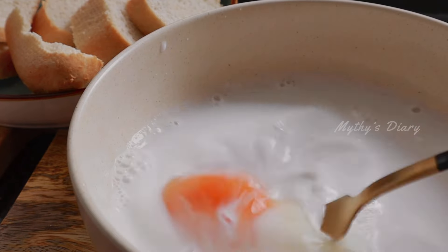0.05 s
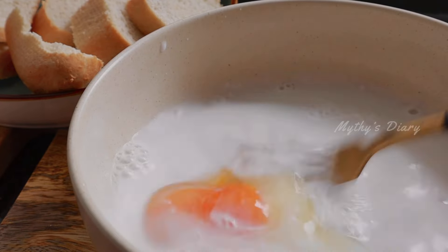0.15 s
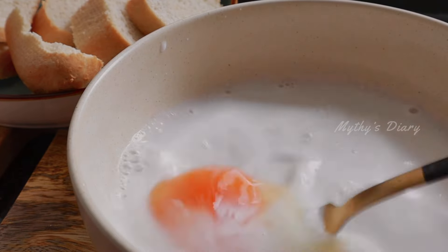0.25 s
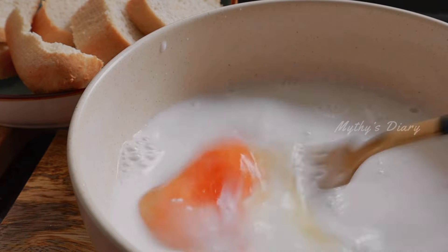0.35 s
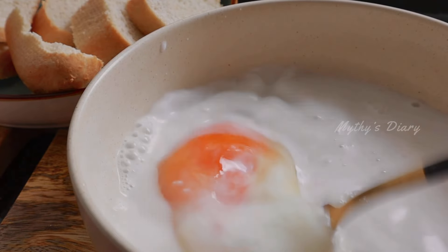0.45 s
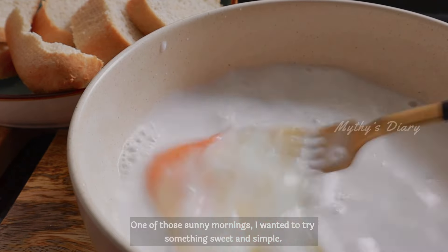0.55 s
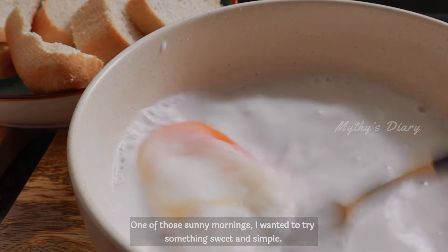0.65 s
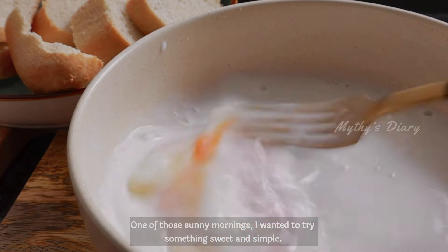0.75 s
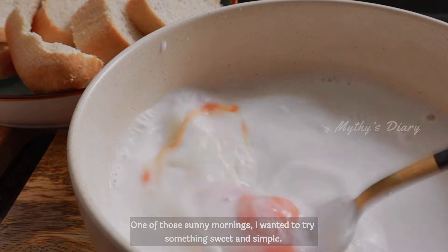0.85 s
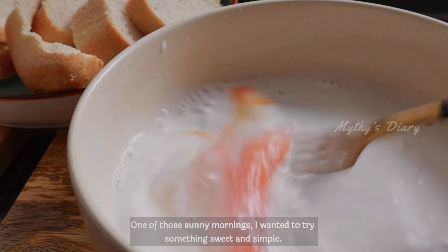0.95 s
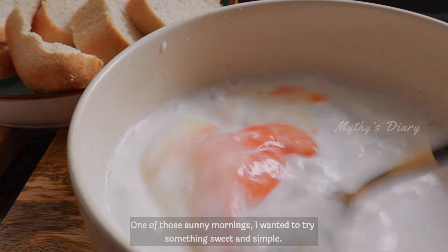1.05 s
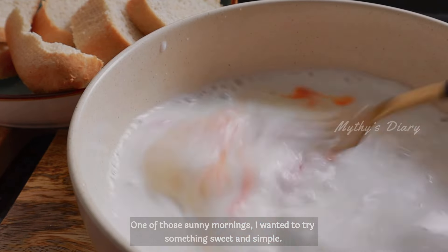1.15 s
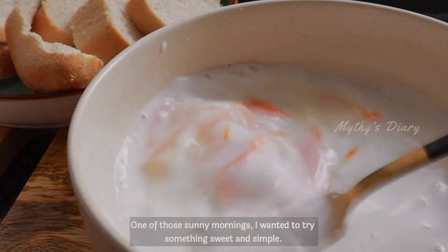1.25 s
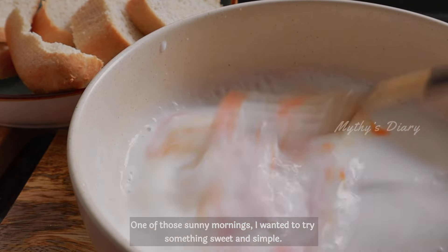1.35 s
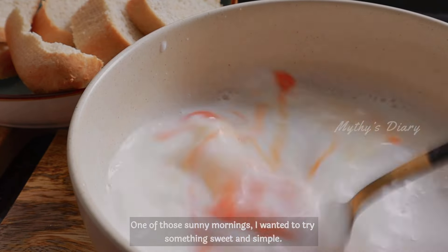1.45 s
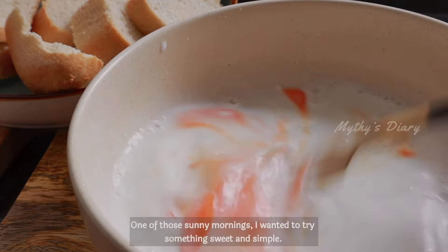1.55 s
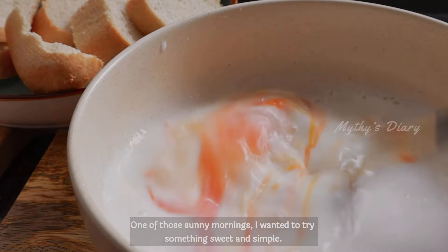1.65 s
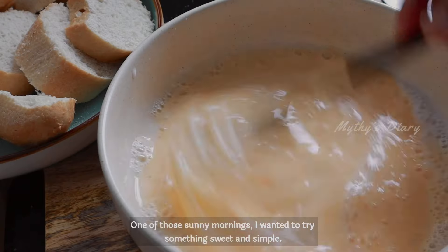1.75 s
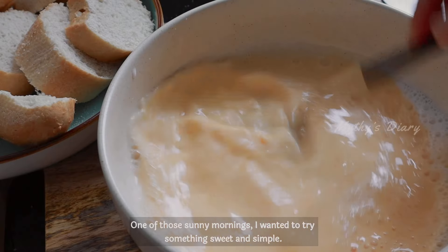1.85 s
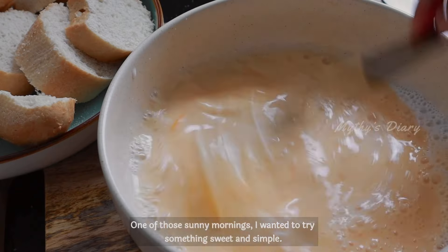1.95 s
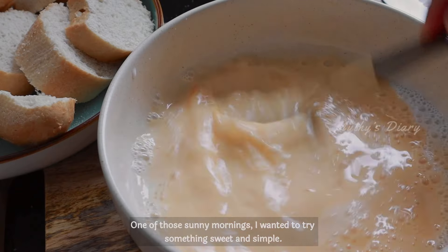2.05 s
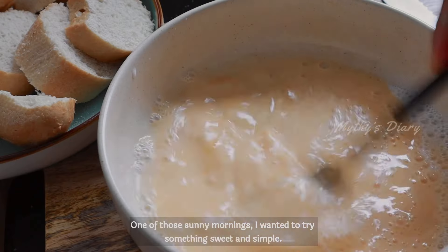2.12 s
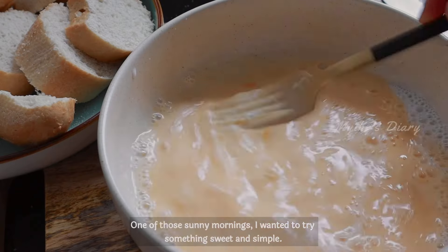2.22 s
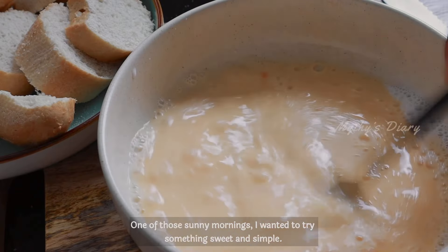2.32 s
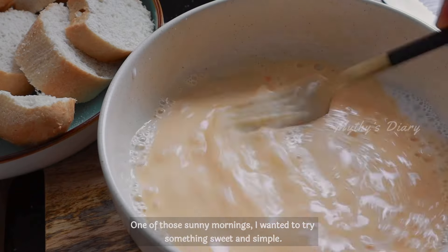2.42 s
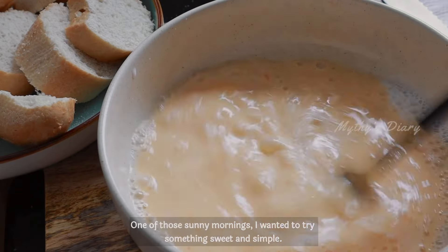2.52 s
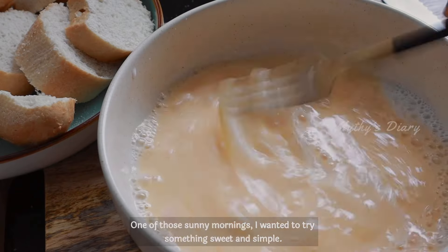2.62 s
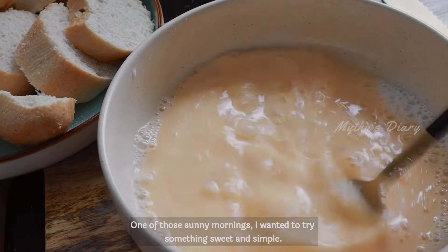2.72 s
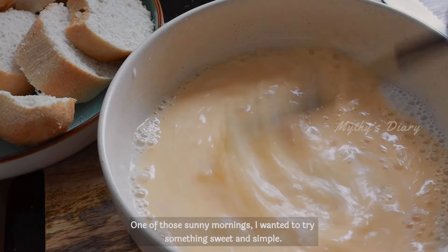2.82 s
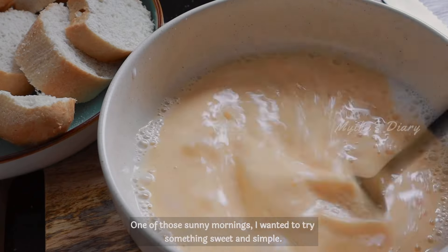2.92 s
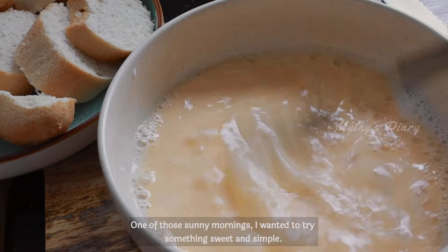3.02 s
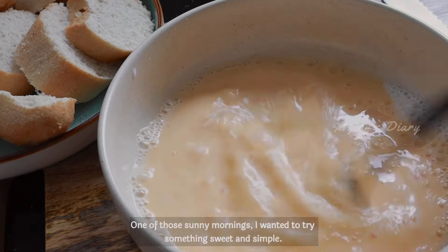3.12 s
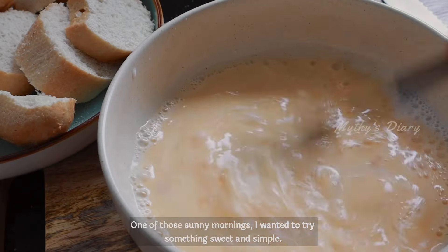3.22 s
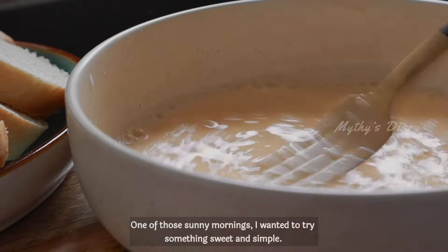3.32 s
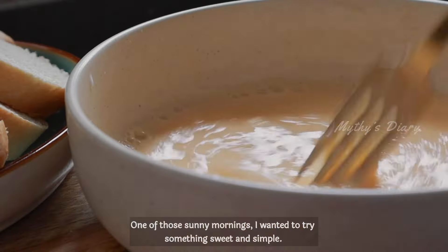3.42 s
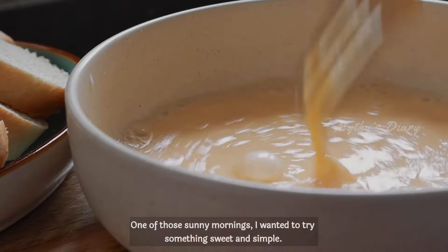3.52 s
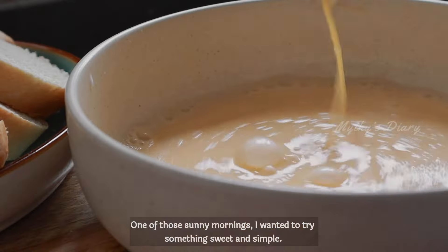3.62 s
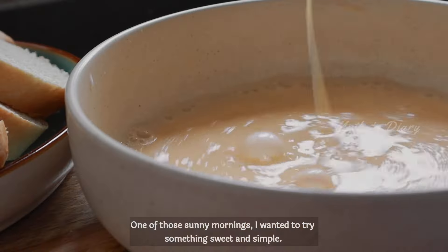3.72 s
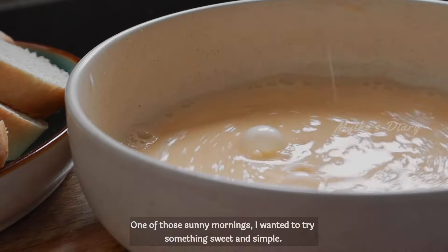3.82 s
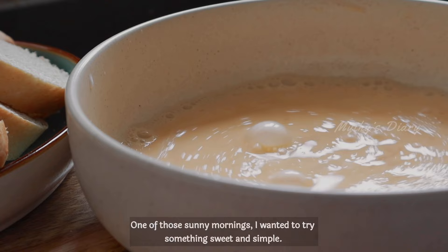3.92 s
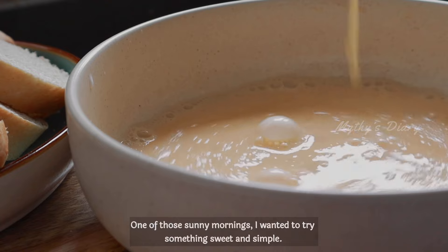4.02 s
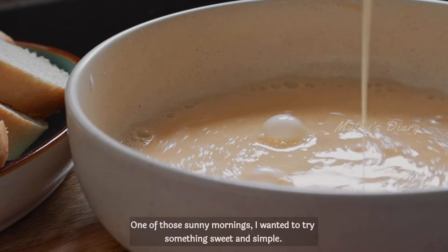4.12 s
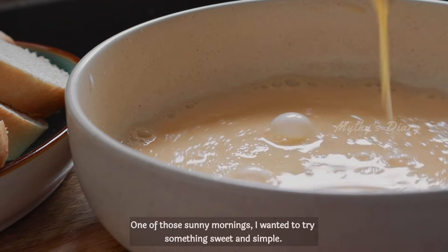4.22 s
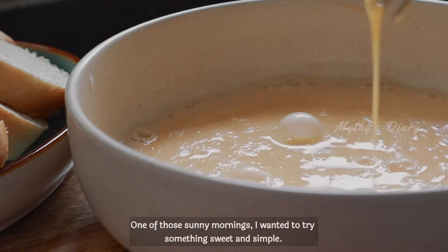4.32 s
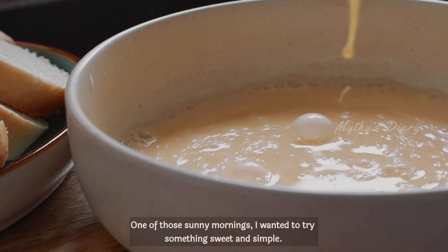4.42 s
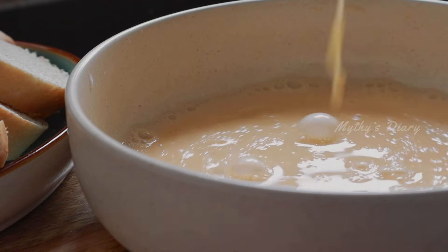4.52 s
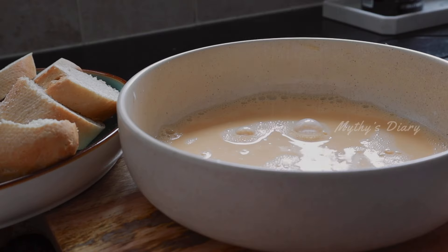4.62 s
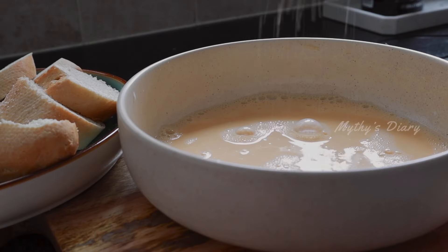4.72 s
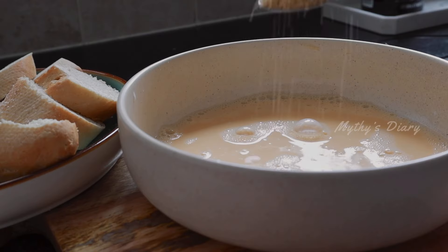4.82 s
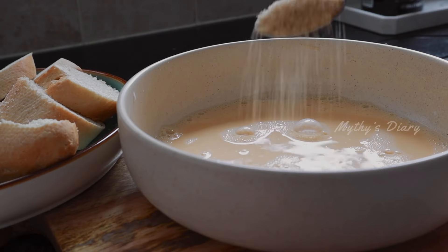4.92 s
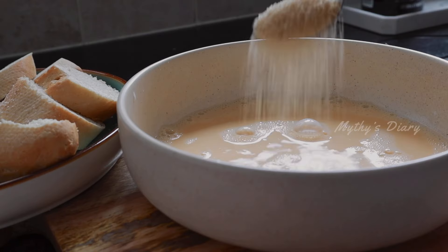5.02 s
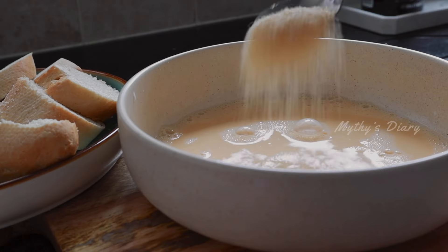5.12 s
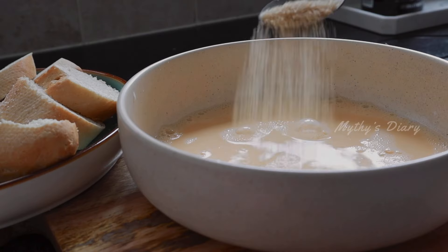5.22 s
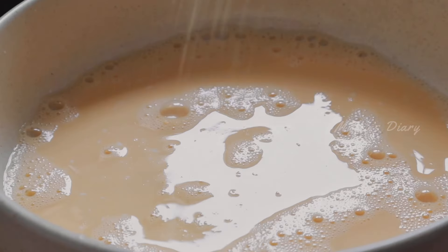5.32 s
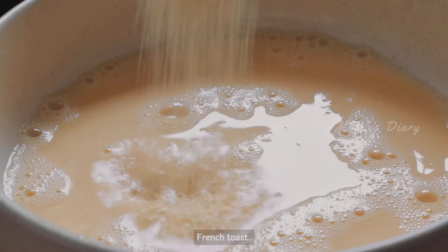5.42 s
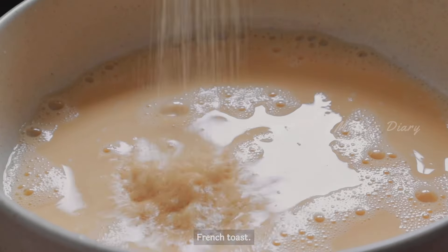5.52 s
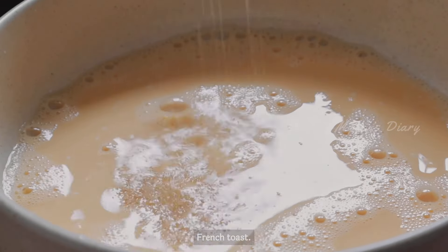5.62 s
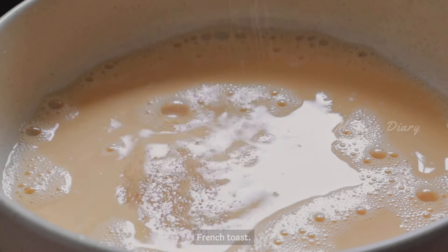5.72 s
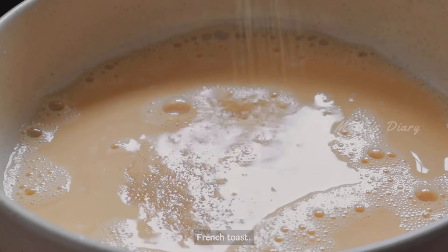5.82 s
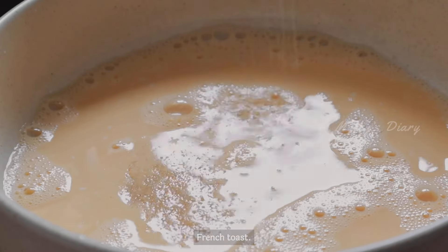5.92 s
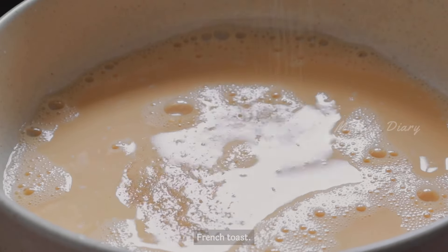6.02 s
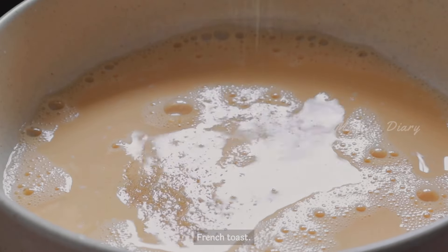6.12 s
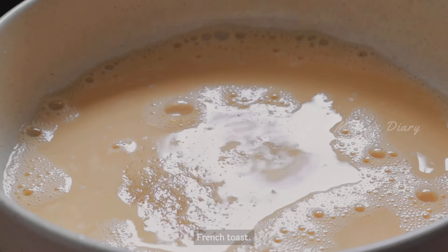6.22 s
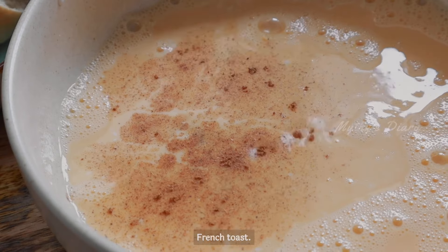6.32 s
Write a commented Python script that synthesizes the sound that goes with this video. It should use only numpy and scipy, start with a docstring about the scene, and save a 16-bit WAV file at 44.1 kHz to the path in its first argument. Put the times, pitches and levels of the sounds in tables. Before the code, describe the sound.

A metal fork briskly beats egg and milk in a ceramic bowl with bright clinks and wet plops, then sugar sprinkles off a spoon.

```python
"""A steel fork beats egg and milk in a ceramic bowl, over hum, hiss and low rumble in a quiet kitchen.
From the start each stroke knocks noise bursts into the bowl's rings and drags gritty tines along the glaze;
trapped air plops out as rising sines, and the bowl bumps the table. After 3.5 s the beating has stopped and
noise bursts knock across the kitchen. From 4.7 s a spoon sprinkles sugar: sparse clicks and ringing ticks.
Close sound with a short room echo, in five short passages faded in and out."""
import sys
import numpy as np
from scipy import signal
from scipy.fft import rfft, irfft, next_fast_len
from scipy.io import wavfile
from scipy.ndimage import uniform_filter1d, map_coordinates

SR = 44100
rng = np.random.default_rng(int(sys.argv[2]) if len(sys.argv) > 2 else 0)


def undo_db(level):
    """Turn decibels back into plain size, where 20 dB means ten times bigger."""
    steps = np.asarray(level, float) / 20
    return 10 ** steps


def dump(signal):
    """Clip the signal to [-1, 1] and save it as 16-bit WAV at the path in sys.argv[1]."""
    limited = np.clip(np.atleast_2d(signal).T, -1, 1)
    pcm = np.round(limited * 32767).astype(np.int16)
    wavfile.write(sys.argv[1], SR, pcm)


N = 280476
TIME = np.arange(N) / SR


def unit(x):
    """Scale to rms 1."""
    return x / np.sqrt(np.mean(np.abs(x) ** 2) + 1e-20)


def along(points, hz):
    """Read a curve of (frequency [Hz], value) points on a log frequency axis."""
    f, value = np.transpose(points)
    return np.interp(np.log(hz + 1), np.log(f + 1), value)


def level(rows):
    """Gain per sample from (time [s], level [dB]) rows, practically silent outside them."""
    return undo_db(np.interp(TIME, *np.transpose(rows), -150, -150))


def swell(peak, db, up_db_per_s, down_db_per_s):
    """Gain that climbs to a peak and falls away, straight in dB."""
    return undo_db(db - np.maximum(up_db_per_s * (peak - TIME), down_db_per_s * (TIME - peak)))


def wobble(rate):
    """A smooth random curve, rate knots a second."""
    knots = rng.standard_normal(int(N * rate / SR) + 4)
    return map_coordinates(knots, [TIME * rate])


def filtered(x, response, size):
    """x through a complex response of frequency, size samples long."""
    m = next_fast_len(size + 8192)
    return irfft(rfft(x, m) * response(np.fft.rfftfreq(m, 1 / SR)), m)[:size]


def causal(gain):
    """Minimum-phase response with this gain: the energy comes as early as it can."""
    cepstrum = irfft(np.log(gain + 1e-6))
    half = len(cepstrum) // 2
    cepstrum[1:half] *= 2
    cepstrum[half + 1:] = 0
    return np.exp(rfft(cepstrum))


def modes(table, f, spread_db, damping=1):
    """Sum of resonances of alternating sign, each at a new random strength; damping widens them."""
    draw = rng.normal(0, spread_db, len(table))
    total = 0
    for k, (centre, width, db) in enumerate(table):
        loss = 1j * f * width * damping
        total = total + (-1) ** k * undo_db(db + draw[k]) * loss / (centre * centre - f * f + loss)
    return total


def grit(size, density, spread_db):
    """Sparse contacts of uneven size, density a second on average, rms 1."""
    hit = rng.random(size) < density / SR
    return unit(hit * rng.standard_normal(size) * undo_db(spread_db * rng.exponential(1, size)))


def patchy(x, depth_db):
    """Random gain in patches of some hundred Hz by some ms: the contact spot keeps changing."""
    z = signal.stft(x, nperseg=256)[2]
    field = uniform_filter1d(rng.standard_normal(z.shape), size=3, axis=0)
    field = uniform_filter1d(field, size=4, axis=1)
    return unit(signal.istft(z * undo_db(depth_db * unit(field)), nperseg=256)[1][:len(x)])


def add(track, s, x):
    """Mix x in at time s."""
    part = track[round(s * SR):][:len(x)]
    part += x[:len(part)]


# spectrum of the room tone: (frequency [Hz], density [dB per Hz])
ROOM_SPECTRUM = [(24, -45.5), (40, -15.5), (70, -6.5), (168, -7.5), (222, -2.5), (308, -10), (358, -14),
                 (406, -13), (593, -19.5), (725, -18.5), (1940, -25), (2760, -26.5), (3730, -28),
                 (14500, -32), (15900, -34), (16500, -46.5)]


def room_tone():
    """Wavering hum and steady hiss of the kitchen: noise split near 420 Hz, each part rms 1."""
    noise = rng.standard_normal((2, N))

    def bass(f):
        return 1 / (1 + (f / 420) ** 4)

    hum = filtered(noise[0] * undo_db(2.0 * wobble(30)), lambda f: undo_db(along(ROOM_SPECTRUM, f)) * bass(f), size=N)
    hiss = filtered(noise[1], lambda f: undo_db(along(ROOM_SPECTRUM, f)) * (1 - bass(f)), size=N)
    return unit(hum), unit(hiss)


# swells of the rumble: (peak time [s], level before trim [dB])
RUMBLE_SWELLS = [(.1, -57), (.5, -61.5), (.95, -67), (1.171, -50), (1.6, -51), (1.95, -54.5), (2.3, -56),
                 (2.699, -62.5), (4.25, -73), (5, -76), (5.55, -65), (6.1, -61)]


def rumble():
    """Noise through a resonance at 53 Hz, in swells that climb fast and fade slowly."""
    noise = filtered(rng.standard_normal(N), lambda f: modes([(53.3, 30, 0)], f, spread_db=0) ** 2, size=N)
    gain = sum(swell(s, db, up_db_per_s=90, down_db_per_s=35.5) for s, db in RUMBLE_SWELLS)
    return unit(noise) * gain * undo_db(-6.5)


# decay of the room: (frequency [Hz], time to fall 60 dB [s])
ROOM_DECAY = [(300, 1), (2000, 0.69), (6000, 0.54), (14000, 0.45)]


def kitchen(x):
    """The room answers each tenth of a second with a fresh noise tail; near surfaces answer first and stronger."""
    out, step = np.zeros(N), SR // 10
    for start in range(0, N, step):
        piece = x[start:start + step]
        if np.any(piece):
            hz, t, z = signal.stft(rng.standard_normal(SR // 2), SR, nperseg=256)
            decay = undo_db(-60 * t / along(ROOM_DECAY, hz)[:, None])
            early = 1 + 1.3 * undo_db(-60 * t / 0.1)
            tail = signal.istft(z * decay * early, SR, nperseg=256)[1]
            add(out, start / SR + .006, signal.fftconvolve(piece, tail / np.linalg.norm(tail)))
    return out


# knocks across the kitchen: (time [s], level [dB], time to fall 60 dB [s])
FAR_KNOCKS = [(3.701, -45.5, 0.44), (3.892, -45, .03)]
# their spectrum: (frequency [Hz], density [dB per Hz])
FAR_SPECTRUM = [(350, -46), (600, -12), (1450, -3.5), (4050, -11), (4780, -11), (8990, -18), (16000, -36.5)]


def far_knocks():
    """Knocks from across the kitchen arrive mostly as echo: a burst of noise that dies away."""
    out, t = np.zeros(N), np.arange(SR // 3) / SR
    for s, db, t60 in FAR_KNOCKS:
        burst = filtered(rng.standard_normal(len(t)), lambda f: undo_db(along(FAR_SPECTRUM, f)), size=len(t))
        add(out, s, undo_db(db - 60 * t / t60) * unit(burst))
    return out


# ticks at the spoon: (time [s], level [dB], pitch [Hz])
SPOON_TICKS = [(4.7101, -20.5, 3220), (4.7148, -24.5, 2990), (4.9283, -37, 2930), (4.9456, -40, 8300),
               (4.9736, -44, 4690), (5.0861, -42, 8480), (5.1163, -38, 4640), (5.195, -41, 7900),
               (5.2268, -36, 4650), (5.247, -36, 4680), (5.3125, -26, 7500), (5.5086, -32.5, 8800),
               (5.53, -31.5, 8240), (5.572, -38, 6500), (5.6144, -45, 8610), (5.7258, -41.5, 7800),
               (5.766, -45.5, 8360), (5.8292, -46.5, 8640), (5.9394, -28, 7500), (5.9703, -45, 8060),
               (6.0129, -37, 8040), (6.0197, -32, 8500), (6.113, -42.5, 7520), (6.1252, -46, 7480)]


def spoon_ticks():
    """Lone crystals tick the spoon: a short sine with a crack of noise, thinned below 1.3 kHz."""
    ticks, t = np.zeros(N), np.arange(600) / SR
    for s, db, hz in SPOON_TICKS:
        crack = rng.standard_normal(len(t)) * undo_db(-60 * t / 0.0046)
        add(ticks, s, undo_db(db - 60 * t / 0.008) * (np.sin(2 * np.pi * hz * t) + 0.54 * crack))
    # a crystal is too small for bass
    return filtered(ticks, lambda f: (1j * f / (1300 + 1j * f)) ** 3, size=N)


# shakes of the spoon: (peak time [s], level before trim [dB], time of the last 23 dB of rise [s],
# fall [dB per s], level of the part under 5.5 kHz against the part above [dB])
SUGAR_SHAKES = [(4.714, -41.5, 0.0032, 136, 1), (4.926, -53, .004, 126, -4), (5.09, -50.5, .02, 170, -7),
                (5.195, -52.5, 0.014, 103, -5.5), (5.231, -46.5, 0.059, 111, 1),
                (5.506, -47, 0.014, 75, -5.5), (5.636, -42, .07, 222, -4.5), (5.938, -45.5, .016, 400, -15),
                (6.018, -46, .026, 390, -23), (6.112, -56, .008, 202, -3)]
# spectrum of the crystals: (frequency [Hz], density [dB per Hz])
GRAIN_SPECTRUM = [(1060, -73), (1800, -13.5), (3740, -16), (4380, -11), (6060, -7.5), (8310, -4),
                  (10400, -10), (14900, -8), (16000, -11), (16500, -37.5)]
# rings of the spoon: (frequency [Hz], width [Hz], level [dB])
SPOON_MODES = [(3380, 220, -0.5), (4650, 120, -3), (7545, 530, -2.5), (8540, 420, 1)]


def sugar():
    """Crystals slide off the ringing spoon and patter on the mix in clumps: sparse grit, swelling with each shake."""
    fall = grit(N, density=10000, spread_db=2.5) * undo_db(2.2 * wobble(70))
    fall = patchy(fall, depth_db=3)

    def lower(f):
        return 1 / (1 + (f / 5500) ** 6)

    def colour(f):
        ring = 2.5 + 1.1 * np.abs(modes(SPOON_MODES, f, spread_db=2))
        return undo_db(along(GRAIN_SPECTRUM, f)) * ring / (1 + (2500 / (f + 1)) ** 6)

    low = unit(filtered(fall, lambda f: causal(colour(f) * lower(f)), size=N))
    high = unit(filtered(fall, lambda f: causal(colour(f) * (1 - lower(f))), size=N))
    patter = np.zeros(N)
    for s, db, rise, fall_db_per_s, low_db in SUGAR_SHAKES:
        patter += swell(s, db, 23 / rise, fall_db_per_s) * (high + low * undo_db(low_db))
    return spoon_ticks() + patter * undo_db(-3.5)


# the bowl bumps the table: (time [s], level before trim [dB], level of the upper modes [dB])
TABLE_BUMPS = [(0.114, -48.5, -11), (0.308, -46, -18), (0.514, -42, -7.5), (0.919, -41.5, -8),
               (1.159, -48, -2), (1.195, -46.5, 0), (1.544, -53.5, -0.5), (1.577, -49.5, -8),
               (1.952, -36.5, 0.5), (2.145, -36, 3.5), (2.35, -38.5, 2), (2.551, -41.5, 1.5),
               (2.773, -37, 3.5), (2.983, -39, 2), (3.191, -42, 2.5), (3.456, -39.5, -2)]
# modes of bowl on table: (frequency [Hz], width [Hz], level [dB])
TABLE_MODES = [(160, 15, 3.5), (242.3, 15, -2), (337, 35, -0.5)]


def bumps():
    """Hard strokes rock the bowl on the table: a soft, uneven push of some milliseconds."""
    out = np.zeros(N)
    for s, db, upper_db in TABLE_BUMPS:
        push = np.convolve(np.hanning(60), rng.standard_normal(700) * np.hanning(1400)[700:])

        def body(f):
            lowest = modes(TABLE_MODES[:1], f, spread_db=0.5)
            return lowest - undo_db(upper_db) * modes(TABLE_MODES[1:], f, spread_db=0.0)

        thud = filtered(push, body, size=12000)
        add(out, s, undo_db(db + 1.0) * thud / np.abs(thud).max())
    return out


def bubble(hz, t60, rise, t):
    """Trapped air rings unsteadily at a pitch that rises as the pocket nears the surface."""
    pitch = hz * 2 ** np.minimum(rise * t - .04, 2.5)  # rise in octaves per s
    shake = np.cumsum(rng.standard_normal(len(t))) * 0.08
    envelope = undo_db(-60 * t / max(t60, .005)) * (1 - np.exp(-t / 0.00074))
    return envelope * np.sin(2 * np.pi * np.cumsum(pitch) / SR + shake)


# air pockets bursting in the mix: (time [s], level before trim [dB], pitch [Hz])
POCKETS = [(0.2093, -43, 1510), (0.233, -41.5, 2440), (.849, -37, 3140), (.9687, -27.5, 4100),
           (.986, -26, 877), (.9862, -27, 2020), (1.06, -32, 2780), (1.0879, -25, 3150), (1.189, -50, 674),
           (1.205, -55, 526), (1.4316, -32, 4270), (1.4501, -26.5, 4300), (1.585, -38.5, 866),
           (1.614, -45.5, 708), (2.006, -31.5, 1087), (2.057, -31, 1680), (2.0694, -38.5, 2050),
           (2.181, -29.5, 955), (2.203, -31.5, 867), (2.228, -40.5, 830), (2.2394, -42, 2160),
           (2.416, -32, 817), (2.427, -27, 932), (2.454, -32, 729), (2.4553, -13.5, 2610),
           (2.47, -38.5, 760), (2.4728, -32, 1760), (2.6, -27.5, 1066), (2.6334, -25, 1920),
           (2.67, -41, 687), (2.794, -26, 1154), (2.856, -40.5, 1110), (2.9044, -27.5, 1307),
           (3.081, -41.5, 502), (3.091, -30, 1850), (3.2754, -30.5, 2100), (3.304, -36, 1010),
           (3.3388, -19.5, 1880)]
# large pockets drain: (time [s], level before trim [dB], pitch [Hz], time to fall 60 dB [s], rise [octaves per s])
LARGE_POCKETS = [(2.629, -29, 650, .14, 1), (2.904, -27, 860, .07, 3), (3.09, -45, 540, .2, 20)]
# the liquid moving: (time [s], level before trim [dB])
SLOSH_LEVEL = [(0, -89), (.74, -65), (1.08, -57.5), (1.3, -72), (1.67, -52), (1.75, -80), (1.9, -80),
               (2.12, -60.5), (2.35, -53), (3.12, -56.5), (3.3, -65.5)]


def bubbles():
    """The loud pockets one by one, many small ones at random as the liquid sloshes."""
    out, swarm, t = np.zeros(N), np.zeros(N), np.arange(SR // 5) / SR
    # a pocket rings 50 periods until -60 dB and gains 0.0032 octaves a period
    pockets = [(s, db, hz, 50 / hz, 0.0032 * hz) for s, db, hz in POCKETS]
    for s, db, hz, t60, rise in pockets + list(LARGE_POCKETS):
        add(out, s, undo_db(db + 2.0) * bubble(hz, t60, rise, t))
    count = 700
    times, pitches, sizes = rng.uniform(0, 2.9, count), rng.standard_normal(count), rng.exponential(1, count)
    for when, pitch, size in zip(times, pitches, sizes):
        hz = 1000 * np.exp(.35 * pitch)
        add(swarm, when, undo_db(1.3 * size) * bubble(hz, 22 / hz, 7.1, t[:2000]))
    slosh = level(SLOSH_LEVEL)
    return out + undo_db(-4.5) * slosh * swarm / np.std(swarm[slosh > 1e-6])


# rings of bowl and fork together: (frequency [Hz], width before damping [Hz], level [dB])
BOWL_MODES = [(1540, 200, -4), (2050, 160, 3), (2261, 59, 4.5), (2730, 260, -0.5), (3600, 120, -9.5),
              (4190, 33, -5), (5460, 120, 2.5), (6430, 48, 2), (6570, 100, -4), (6640, 440, -4.5),
              (8540, 450, -2), (8720, 35, -5), (9880, 32, -14), (11600, 170, -20), (11760, 160, -15),
              (12350, 530, -12), (14600, 73, -20)]
# clatter between the rings: (frequency [Hz], density [dB per Hz])
CLATTER_SPECTRUM = [(290, -59), (500, -30.5), (952, -5), (1280, -13), (1540, -3.5), (2070, -10),
                    (3710, 0.5), (8420, 3.5), (9600, -12.5), (15100, -12), (16500, -42)]


def bowl(f, between_db):
    """Modes, damped by the liquid, over a broad clatter; both are cut below the first mode."""
    ring = np.abs(modes(BOWL_MODES, f, spread_db=3.5, damping=1.6))
    clatter = undo_db(between_db + along(CLATTER_SPECTRUM, f))
    return (ring + clatter) / (1 + (1250 / (f + 1)) ** 6)


def zones(f):
    """Low, middle and high part of the ring; they sum to one."""
    low = 1 / (1 + (f / 3600) ** 6)
    high = 1 - 1 / (1 + (f / 7500) ** 8)
    return low, 1 - low - high, high


# a tine squeaks on the glaze: (middle [s], level [dB], pitch [Hz], length [s])
TINE_SQUEAKS = [(0.147, -21, 7000, 0.021), (0.171, -19.5, 6840, 0.031), (0.343, -30.5, 2040, 0.034),
                (.362, -19.5, 6170, .012), (2.571, -26, 1545, .015), (2.615, -21, 2025, .03),
                (2.821, -18.5, 2050, 0.02), (3.036, -22, 2080, 0.026), (3.219, -20.5, 1540, 0.028),
                (3.252, -25.5, 1790, 0.028)]


def squeaks():
    """A tine sings on the glaze: a sine of drifting phase that swells and fades."""
    out = np.zeros(N)
    for s, db, hz, length in TINE_SQUEAKS:
        t = np.arange(int(length * SR)) / SR
        drift = np.cumsum(rng.standard_normal(len(t))) * 0.081
        add(out, s - length / 2, undo_db(db) * np.hanning(len(t)) * np.sin(2 * np.pi * hz * t + drift))
    return out


# tines drag on the glaze: (touch [s], lift [s], level at touch before trim [dB],
# level at lift before trim [dB], brightness [dB])
TINE_DRAGS = [(.11, 0.177, -39, -31, 6), (.312, 0.361, -30.5, -29, 4.5), (.49, 0.496, -31, -34.5, -6),
              (.512, .546, -33, -26.5, 2.5), (0.806, .85, -54, -53.5, -8), (.887, 0.911, -51.5, -59, 3.5),
              (0.916, 0.968, -26.5, -37, 3.5), (1.082, 1.105, -37.5, -52.5, -3),
              (1.126, 1.156, -26, -30.5, 2.5), (1.325, 1.364, -27, -31, 6), (1.522, 1.551, -29, -25.5, 2.5),
              (1.742, 1.93, -40, -63, -2.5), (1.943, 1.997, -23, -34.5, -2), (2.14, 2.215, -25.5, -35, 0.5),
              (2.349, 2.407, -28, -31.5, 1.5), (2.41, 2.443, -42.5, -42.5, -4),
              (2.547, 2.611, -31, -28.5, 1), (2.77, 2.822, -21.5, -37, -3.5),
              (2.98, 3.043, -21.5, -34, -1.5), (3.192, 3.255, -20.5, -37.5, -0.5),
              (3.453, 3.51, -41, -47, -6)]


def drags():
    """Stick-slip grit of the tines rings the bowl while they touch; each part of the ring is caught unevenly."""
    settle_s, settle_db, leave_s, leave_db = 0.0064, -6.5, .02, -23  # tines settle on the glaze and leave it
    out = np.zeros(N)
    f = np.fft.rfftfreq(16384, 1 / SR)
    for touch, lift, touch_db, lift_db, bright_db in TINE_DRAGS:
        t = np.arange(touch, lift + leave_s, 1 / SR)
        press_db = np.interp(t, [touch, touch + settle_s, lift, lift + leave_s],
                             [touch_db + settle_db, touch_db, lift_db, lift_db + leave_db])
        # mid-stroke the fork is fastest: brighter
        speed = np.sin(np.pi * np.minimum((t - touch) / (lift - touch), 1))
        # from 1.9 s on, low and high ring stand out more
        later_db = 3 * (touch > 1.9)
        low_db = -1 + later_db - bright_db - 3.5 * speed
        high_db = -5 + later_db + bright_db + 3.5 * speed
        for zone, rel_db in zip(zones(f), (low_db, 0, high_db)):
            for tine in range(2):
                catch = undo_db(2.8 * map_coordinates(rng.standard_normal(64), [(t - touch) * 170]))
                slip = patchy(catch * grit(len(t), density=7000, spread_db=3), depth_db=4.5)
                push = slip * undo_db(press_db + rel_db - 2.5)
                gain = causal(bowl(f, between_db=-6) * zone)
                add(out, touch, irfft(rfft(push, 16384) * unit(gain))[:len(t) + 5000])
    return out


# tines knock the bowl: (time [s], level before trim [dB], favoured ring [Hz], brightness [dB])
TINE_KNOCKS = [(.0446, -42, 6570, 8), (0.09, -39, 3500, 1), (.1094, -19.5, 7770, 5.5),
               (.1316, -19.5, 7000, 4.5), (0.1488, -9.5, 6780, 3), (0.2782, -25.5, 3400, -11),
               (0.2916, -34, 2760, -4), (0.3106, -10, 8580, 6.5), (.3341, -16.5, 6090, 10.5),
               (0.3526, -11.5, 7400, 7.5), (0.4896, -19.5, 3380, 4.5), (0.5102, -5.5, 6080, 0.5),
               (0.5414, -14, 8790, 3), (.6549, -31.5, 3120, 2.5), (0.6671, -10.5, 2610, -6.5),
               (.73, -42.5, 2477, -5), (.7486, -39, 2790, -5), (.7807, -35, 1850, -12.5),
               (.8088, -34.5, 2770, 0), (.8184, -28, 4400, -11), (0.8858, -24, 5620, 2),
               (.9122, -20, 1844, -8), (0.9227, -1.5, 6450, 5), (0.9293, -1, 8370, 17),
               (0.944, -12, 8460, 7), (1.079, -15, 9170, 16.5), (1.112, -34, 5140, 1),
               (1.1262, -16, 8490, 4.5), (1.2753, -19.5, 8160, 17), (1.2846, -33.5, 7560, 3),
               (1.329, -19.5, 6300, 6.5), (1.3373, -18, 6480, 17), (1.4994, -33.5, 5990, -3),
               (1.5133, -27, 1670, -17.5), (1.522, -25.5, 3320, -5), (1.531, -4, 8100, 4),
               (1.5565, -11, 7790, 5.5), (1.6075, -13, 8120, -0.5), (1.696, -37, 3000, -2.5),
               (1.668, -32, 3910, 2), (1.705, -22.5, 2750, -17), (1.759, -21.5, 4520, 5.5),
               (1.775, -22.5, 7960, 4.5), (1.9423, -12.5, 2900, 0.5), (1.9523, -1.5, 2850, -3),
               (1.9676, -15.5, 2094, -0.5), (1.9799, -13.5, 6040, 1), (2.1369, -17, 8450, 3.5),
               (2.1397, -19.5, 8020, 1.5), (2.1467, 4, 5560, 0.5), (2.215, -20.5, 7860, 3.5),
               (2.34, -27.5, 2645, -1), (2.349, -1.5, 6600, 1), (2.3572, -6.5, 8530, 1.5),
               (2.3904, -14.5, 8170, 5.5), (2.4303, -15.5, 1850, -3.5), (2.538, -31, 2660, -3.5),
               (2.545, -13, 6290, 2.5), (2.5539, -2.5, 2756, -3.5), (2.767, -11.5, 2610, -7),
               (2.7754, 2.5, 6350, -5), (2.7804, -5, 6300, 1), (2.7885, -12, 2020, 0),
               (2.8035, -8, 8600, 5), (2.9739, -20, 2053, 0.5), (2.986, 1.5, 5320, -2),
               (2.9926, -4.5, 2940, -6.5), (3.1856, -28.5, 4830, 2.5), (3.1928, 1.5, 2840, -0.5),
               (3.4493, -23.5, 3350, 0), (3.4557, -8, 2700, -3), (3.4715, -22, 2280, 10)]


def knocks():
    """Each knock is a short burst into the bowl; the spot it lands on favours one ring."""
    out, t = np.zeros(N), np.arange(400) / SR
    f = np.fft.rfftfreq(8192, 1 / SR)
    for s, db, hz, bright_db in TINE_KNOCKS:
        blow = rng.standard_normal(len(t)) * undo_db(-60 * t / 0.0081) * (1 - np.exp(-t / .0003))
        spot = 1 + 1.6 / (1 + ((f - hz) / 350) ** 2)
        body = bowl(f, between_db=-4) * spot
        # a spot that favours a middle ring lifts the whole middle
        zone_db = (-2 - bright_db, 4 * zones(hz)[1], -1.5 + bright_db)
        gain = sum(undo_db(rel_db) * unit(body * zone) for zone, rel_db in zip(zones(f), zone_db))
        ring = irfft(rfft(blow, 8192) * causal(gain))[:6000]
        add(out, s, undo_db(db + 0.35) * ring / np.abs(ring).max())
    return out


# passages: (start [s], faded in [s], fade out [s], end [s])
PASSAGES = [(-.1, 0, 1.61, 1.719), (1.739, 1.86, 3.23, 3.346), (3.368, 3.5, 4.43, 4.565),
            (4.6, 4.74, 5.21, 5.318), (5.352, 5.48, 6.19, 6.316)]
# room tone in each passage: (hiss level [dB], hum level [dB])
ROOM_LEVELS = [(-63.5, -62), (-62.5, -61.5), (-61, -60.5), (-63.5, -64), (-62, -59)]


def scene():
    """Each passage has its own sound and echo, faded at both ends."""
    hum, hiss = room_tone()
    low = rumble()
    close = far_knocks() + sugar() + bumps() + bubbles() + squeaks() + drags() + knocks()
    out = np.zeros(N)
    for (start, full, fading, end), (hiss_db, hum_db) in zip(PASSAGES, ROOM_LEVELS):
        fade = np.interp(TIME, [start, full, fading, end], [0.077, 0.99, 0.93, 0.12], 0, 0) ** 1.2
        inside = close * (fade > 0)
        background = undo_db(hiss_db) * hiss + undo_db(hum_db) * hum + low
        out += fade * (inside + undo_db(-13.0) * kitchen(inside) + background)
    return out[None]


def low_pass(x):
    """Removes everything above the highest recorded frequency."""
    return signal.sosfilt(signal.butter(12, 17140, fs=SR, output="sos"), x)


def record(dry):
    """Peaks round off softly towards a ceiling; the top edge of the treble is faint, with a band limit above."""
    soft = dry[0] / (1 + np.abs(dry[0] / .87) ** 6) ** (1 / 6)
    edge_hz, edge_db, top_hz = 15950, -22, 17100
    mix = filtered(soft, lambda f: (f < top_hz) * undo_db(edge_db * (f > edge_hz)), size=N)
    return low_pass(mix[None])


dry = scene()
out = record(dry)
dump(out)
```